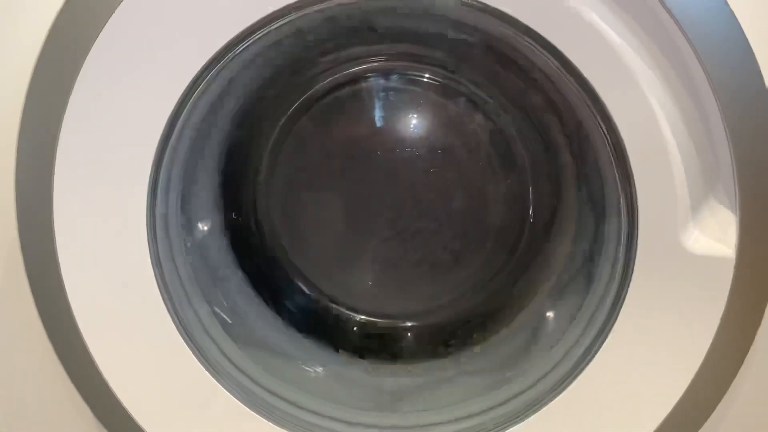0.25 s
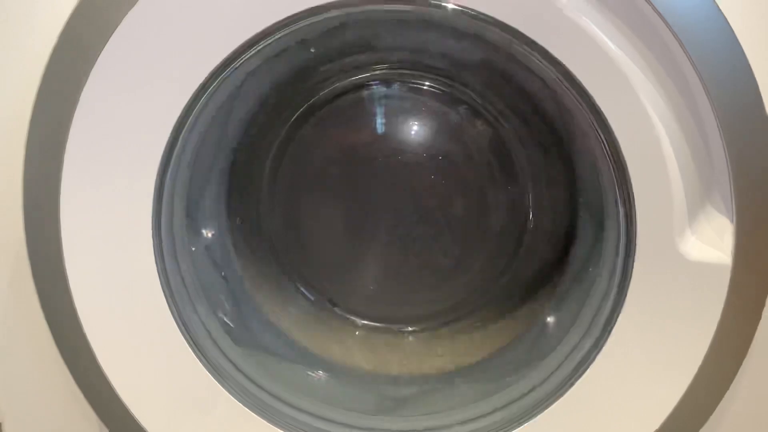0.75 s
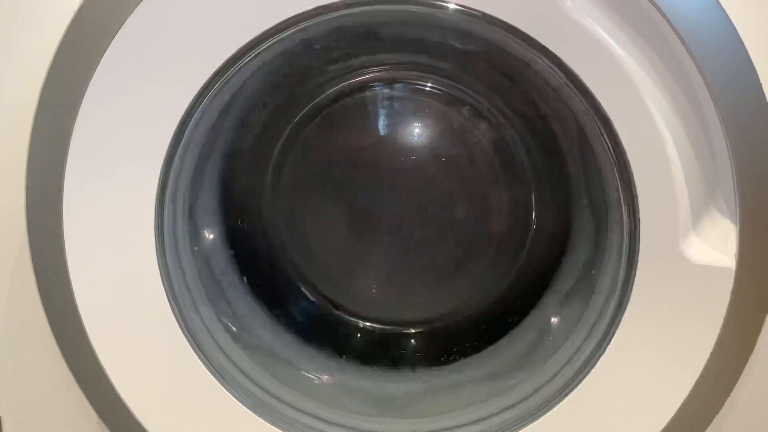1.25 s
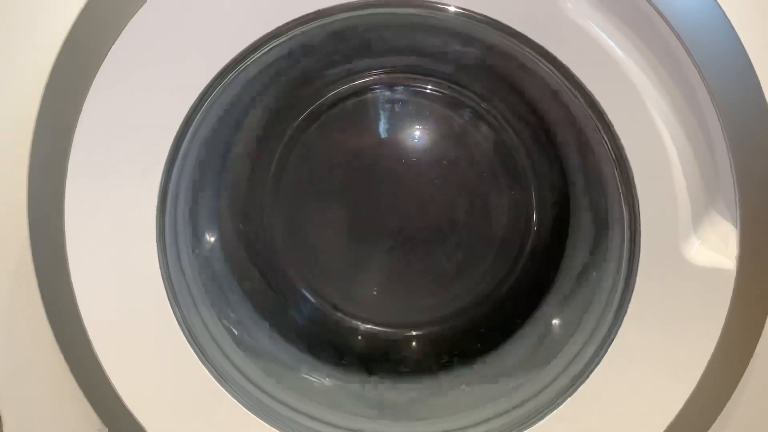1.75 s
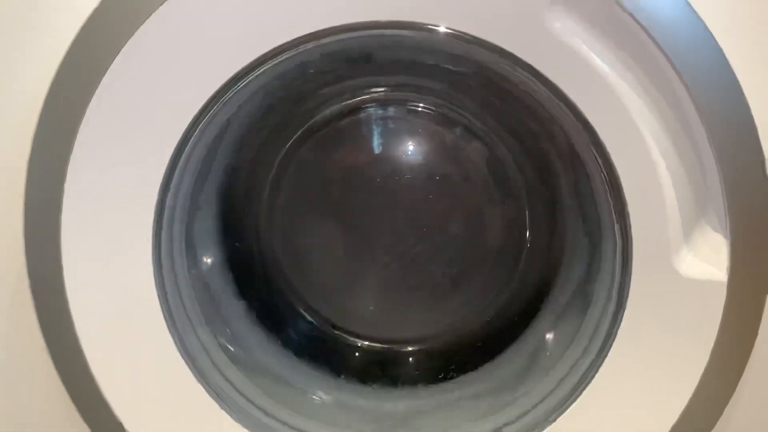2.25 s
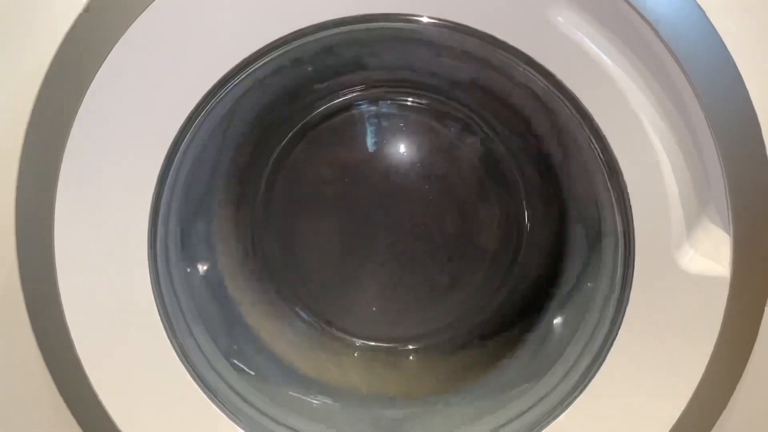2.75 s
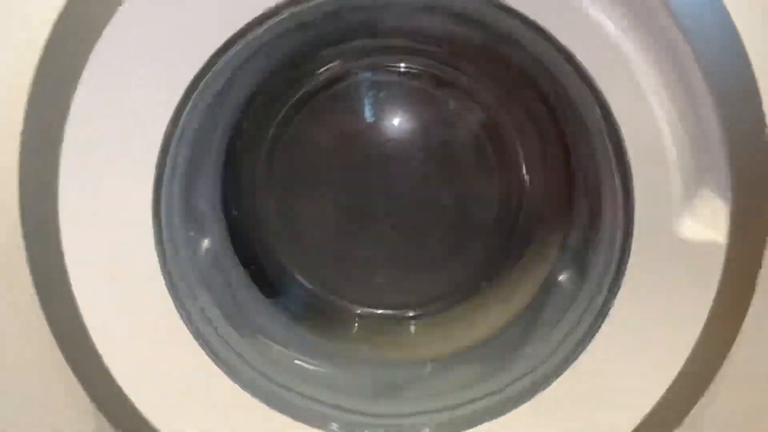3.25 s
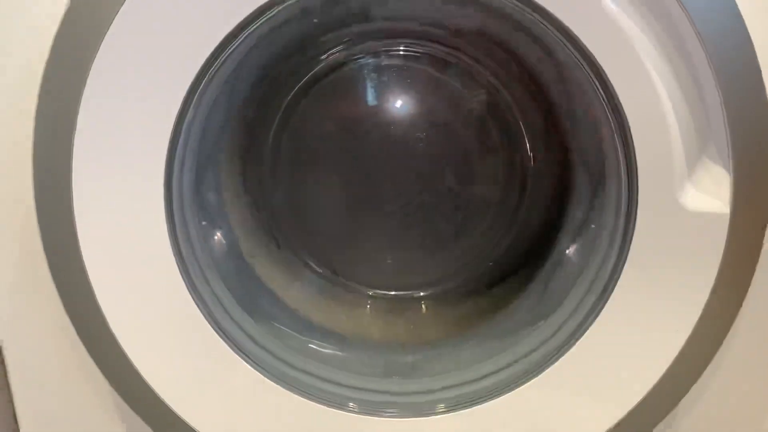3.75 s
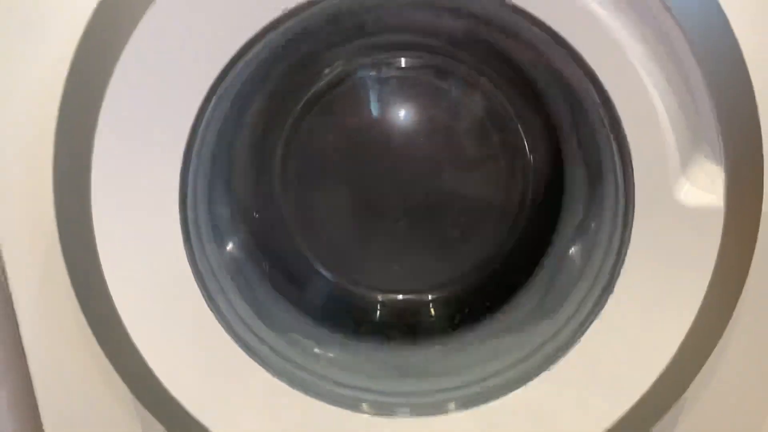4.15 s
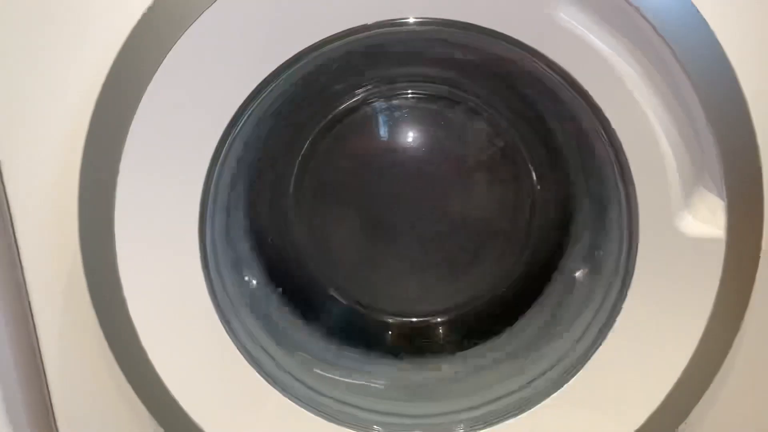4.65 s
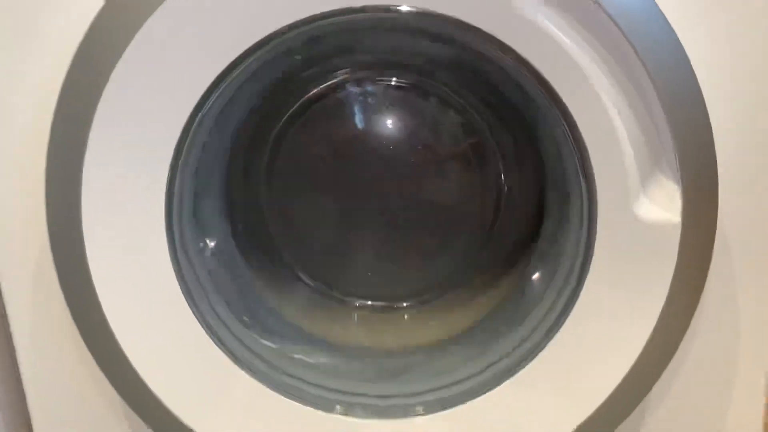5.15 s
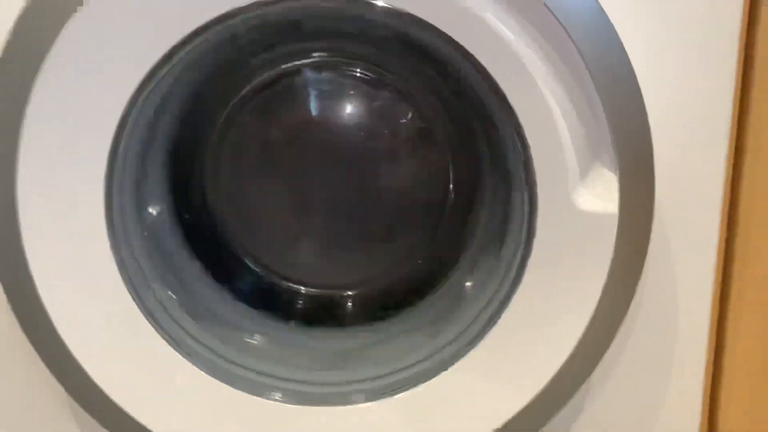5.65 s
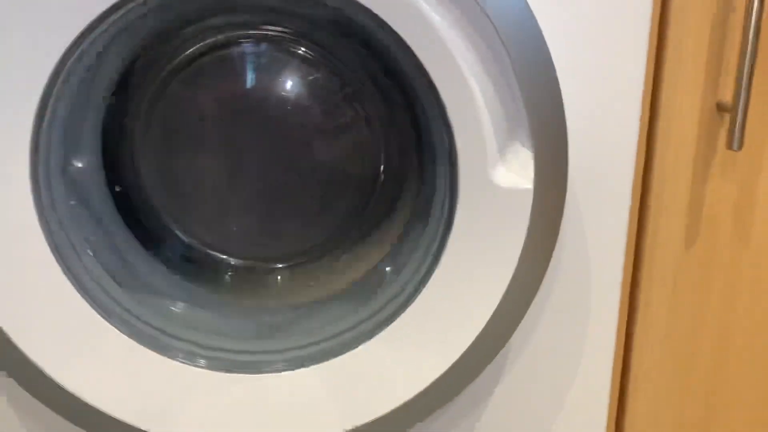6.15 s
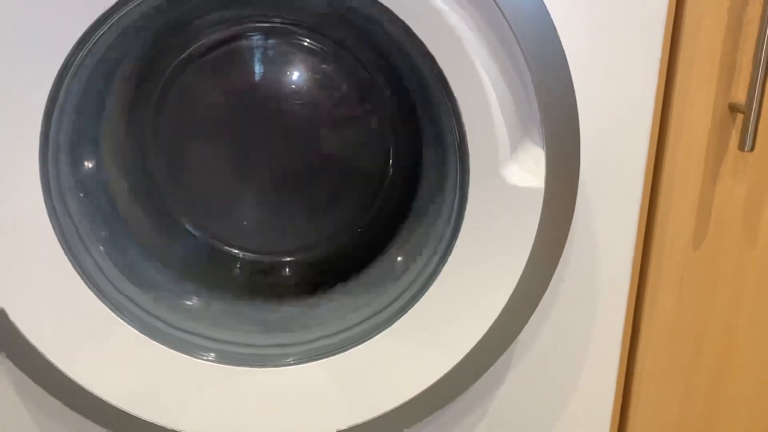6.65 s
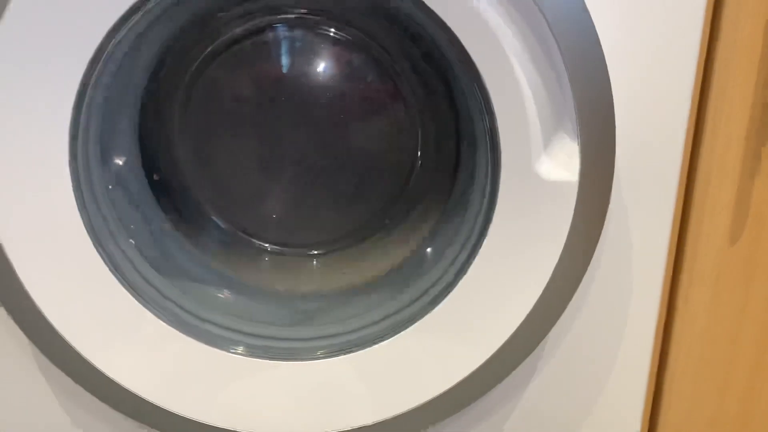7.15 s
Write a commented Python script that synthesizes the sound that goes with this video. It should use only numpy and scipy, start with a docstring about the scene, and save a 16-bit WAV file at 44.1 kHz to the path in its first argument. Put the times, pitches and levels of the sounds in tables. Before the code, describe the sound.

A front-loading washing machine in fast spin, heard close to its door on a hand-held phone in a domestic room. A deep, rapid drum thrum and throbbing mid hum sit under a broad airy roar and fine hiss. Speed rises barely perceptibly. Around three seconds the tone colour shifts as the phone turns and a thin whine emerges. Past five seconds something flicks the drum with a short, scratchy metallic twang; the spin continues.

```python
"""A thumping drum, once a turn, heard from a hand-held phone before the door of a front-loading washing
machine that slowly gains speed. Overtones locked to the turn make the thump and a slower belt throb.
Air and cabinet roar and hiss as shaped noise, over speed-locked and steady tones; the colour shifts as
the phone tilts after a few seconds. Once, something flicks the drum: damped modes ring a short twang."""
import sys
import numpy as np
from scipy import signal
from scipy.fft import rfft, irfft
from scipy.io import wavfile
from scipy.ndimage import uniform_filter1d, minimum_filter1d, map_coordinates

SR = 44100
rng = np.random.default_rng(int(sys.argv[2]) if len(sys.argv) > 2 else 0)


def unload_audio(sound):
    """Save the sound as a 16-bit wav file, at the path given as the first command line argument."""
    columns = np.transpose(np.atleast_2d(sound))
    # keep every value between -1 and 1, then stretch to whole-number steps
    steps = np.round(np.clip(columns, -1, 1) * 32767)
    wavfile.write(sys.argv[1], SR, steps.astype(np.int16))


N = 326340
T = np.arange(N) / SR  # time [s]
HZ = np.arange(1025)[:, None] * SR / 2048  # frequency of each noise bin
FRAMES = np.arange(N // 512 + 5) * 512 / SR  # time of each noise frame [s]

# cabinet resonances that the drum's knock rings: (centre [Hz], width [Hz], level [dB], left minus right [dB])
PANEL_MODES = [(47.3, 11.6, -37.9, 0.2), (69.1, 10.3, -32.1, 1.3), (90.5, 13.2, -28.9, 0.5),
               (107.3, 9.8, -21.9, 0.3), (134.4, 5.0, -37.3, 2.4), (154.9, 33.4, -43.8, 1.4),
               (187.9, 22.2, -39.0, 2.6), (224.7, 9.5, -37.4, 3.0), (247.2, 11.2, -37.7, 1.1),
               (266.0, 45.5, -43.6, 0.2), (304.0, 5.7, -45.0, 1.4), (326.2, 11.5, -47.0, 2.4),
               (379.2, 14.1, -48.9, 4.8), (411.1, 14.0, -49.7, -3.9), (438.5, 8.6, -46.5, 1.2),
               (455.5, 17.8, -53.4, -1.7)]
DRUM_ORDERS = np.arange(2, 32)  # audible overtones of one drum turn
THUMP_DRIFT_DB_S = -0.04  # slow change of level
SMEAR_RAD, SMEAR_FROM, SMEAR_UNTIL = .76, 8, 23.2  # lag per overtone squared; first and last overtone
DETOUR_RAD, DETOUR_FROM = 2.3, 15  # further lag per overtone, counted from this one
LOW_LAG_RAD, LOW_LAG_UNDER = .4, 6  # lag per overtone, counted down from this one
DRUM_OPPOSED = 20  # from this overtone up the ringing parts swing against the knock


def drum_thump(drum):
    """Forced vibration: the unbalanced drum drives the panels once a turn, with dispersed overtones."""
    # above the main cabinet boom the overtones lag progressively, smearing the thump round the turn
    smear = SMEAR_RAD * np.maximum(DRUM_ORDERS - SMEAR_FROM, 0) ** 2
    # the squared lag stops gaining curvature at the highest overtones
    smear = smear - SMEAR_RAD * np.maximum(DRUM_ORDERS - SMEAR_UNTIL, 0) ** 2
    # the panels fall behind by one more cycle
    smear = smear + np.clip(DETOUR_RAD * (DRUM_ORDERS - DETOUR_FROM), 0, 2 * np.pi)
    smear = smear + LOW_LAG_RAD * np.maximum(LOW_LAG_UNDER - DRUM_ORDERS, 0)  # the deepest trail too
    smear = smear + np.pi * (DRUM_ORDERS >= DRUM_OPPOSED)
    thump = knock_overtones(DRUM_ORDERS, drum, PANEL_MODES, smear, .3, .04)
    return thump * undb(THUMP_DRIFT_DB_S * (T - T.mean()))


def knock_overtones(orders, turns, modes, smear, waver_db, waver_rad):
    """Fourier synthesis: one knock a turn, its overtones swelling as speed moves them past resonances."""
    out = 0
    coarse = T[::512]
    rate = np.gradient(turns)[::512] * SR  # turns a second
    mean_db, _ = response(orders * rate.mean(), modes)
    lags = knock_lags(orders, mean_db) - smear
    for k, lag in zip(orders, lags):
        db, pan = (np.interp(T, coarse, v) for v in response(k * rate, modes))
        out = out + tone(k * turns + lag / (2 * np.pi), db, pan, waver_db, waver_rad)
    return out


BETWEEN_DB = -62  # level floor between resonances


def response(hz, modes):
    """Modal superposition: the resonances' powers add to give level and left-right balance [dB] at hz."""
    power = [undb(2 * db) / (1 + (2 * (hz - f) / width) ** 2) ** 2 for f, width, db, _ in modes]
    pan = sum(p * row[3] for p, row in zip(power, modes)) / sum(power)
    return 10 * np.log10(sum(power) + undb(2 * BETWEEN_DB)), pan


def knock_lags(k, db):
    """Minimum phase: a causal knock and ring has phases fixed by the levels of its overtones."""
    n = np.arange(129)
    # levels fall away below the first overtone and above the last
    db = np.interp(n, k, db) - 10 * np.maximum(k[0] - n, 0) - .5 * np.maximum(n - k[-1], 0)
    cepstrum = irfft(np.maximum(db, -100) * np.log(10) / 20)
    # folding the cepstrum to positive time makes the response causal
    cepstrum[1:128] *= 2
    cepstrum[129:] = 0
    return rfft(cepstrum).imag[k]


def tone(cycles, db, pan, waver_db, waver_rad):
    """Phase locking: a sine follows a turning part, with small random wander in level and phase."""
    level = np.sqrt(2) * undb(db + waver_db * walk(3))
    wave = level * np.cos(2 * np.pi * cycles + waver_rad * walk(2))
    return sides(wave, pan)


def walk(rate):
    """Band-limited randomness: random knots, rate a second, joined by a smooth curve, spread near 1."""
    knots = rng.standard_normal(int(N / SR * rate) + 3)
    coarse = T[::256]
    return np.interp(T, coarse, map_coordinates(knots, [coarse * rate], order=2))


def sides(x, pan_db):
    """Level-difference stereo: pan_db is left minus right."""
    return x * undb(np.array([pan_db, -pan_db]).reshape(2, -1) / 2)


def undb(db):
    """Logarithmic level: decibels to amplitude."""
    return 10 ** (np.asarray(db) / 20)


def curve(table, at=T):
    """Linear interpolation: the value of a (time [s], value) table at each moment."""
    return np.interp(at, *np.transpose(table))


# resonances that the belt's knock rings: (centre [Hz], width [Hz], level [dB], left minus right [dB])
PULLEY_MODES = [(667, 7.3, -46, -2), (686.5, 22, -52, 2), (713.3, 40.5, -48.5, 3.5), (752, 14, -53, 5)]
# level of the belt's throb: (time [s], level [dB])
THROB_LEVEL = [(0, 1.5), (2.6, 0.5), (3.5, 0.5), (4.2, -4), (6.1, -5.5), (6.6, 0.5), (7.4, -0.5)]
# how far the phone has turned, for the throb and the roar: (time [s], turn [0-1])
PHONE_TILT = [(0, 0), (2.4, 0.2), (3.05, 0.9), (5, 1), (7.4, 0.86)]
BELT_ORDERS = np.arange(59, 71)  # audible overtones of one belt loop
BELT_OPPOSED = 69  # from this overtone up the ringing parts swing against the knock


def belt_throb(drum, belt):
    """Periodic excitation and modulation: the belt knocks once a loop; the drum sways its tension."""
    opposed = np.pi * (BELT_ORDERS >= BELT_OPPOSED)
    blur = .12 + .5 * curve(PHONE_TILT)  # phase wander [rad]: less crisp once the phone has turned
    throb = knock_overtones(BELT_ORDERS, belt, PULLEY_MODES, opposed, .9, blur) * undb(curve(THROB_LEVEL))
    # the wobbling drum tightens and slackens the belt once a turn
    return throb * (1 + 0.13 * np.cos(2 * np.pi * drum + 1.6))


# broadband roar of drum and air, before resonances and swells: (frequency [Hz], density [dB per Hz])
ROAR_SPECTRUM = [(25, -87), (45, -78), (70, -62), (90, -59), (112, -62), (130, -68), (200, -68), (290, -69),
                 (420, -66), (600, -64.5), (740, -67), (950, -69), (1500, -74), (2000, -76), (3000, -80.5),
                 (4200, -84), (5500, -87.5), (8000, -143), (16000, -105)]
# cabinet resonances over the roar: (centre [Hz], width [Hz], left before the phone turns [dB],
# right before [dB], left after [dB], right after [dB])
CABINET_MODES = [(692, 49, 5, 3.5, 7, 2), (1182, 344, 3.5, 3.5, 9.5, 3.5), (1429, 94, 3.5, 5, 7, 4),
                 (1653, 135, -5.5, -8, 7.5, 8.5), (1707, 135, 10, 13, -2, -8), (2230, 29, 11, 11.5, 10, 5),
                 (2580, 550, 2.5, 2, -0.5, 0), (3330, 120, 5, -1, 2, 2.5), (4640, 450, 0, 2, 5.5, 4.5),
                 (468, 30.5, -5, -21, -7, -28), (616, 35, -32, 0, -2, -18)]
# left-right correlation of the roar without its whine: (frequency [Hz], correlation [0-1])
CORRELATION = [(60, 0.8), (150, .4), (290, 0.55), (640, 0.4), (1400, 0.24), (2500, .2), (3500, .06),
               (16000, 0.03)]
# narrow whine: (time [s], level over the roar [dB], centre [Hz])
WHINE_TRACK = [(0, 1, 3920), (2.4, 2, 3920), (3.1, 7.5, 3925), (4.0, 4, 3890), (5.2, 5.5, 3870),
               (5.8, 7.5, 3870), (6.4, 7, 3885), (6.9, 12, 3905), (7.4, 10.5, 3920)]
# slow changes of the roar as the phone moves: ((centre [Hz], width [Hz]), [(time [s], level [dB])])
ROAR_SWELLS = [((2600, 1900), [(0, -0.5), (2.5, 0), (3.5, 0.5), (4.2, -.5), (7.4, -1)]), ((510, 150),
               [(0, 4), (2.6, 2), (3.5, 5.5), (4.2, 1), (7.4, 2.5)])]
WHINE_WIDTH_HZ = 140
ROCK_HZ, ROCK_DEPTH, ROCK_RAD = [750, 2300], .22, 2.1  # band that flutters each drum turn, depth, phase
LEFT_LATE_S, LATE_FROM_HZ = .00102, [700, 1300]  # left port's delay; sets in across this band


def roar(drum, belt):
    """Spectral shaping: the cabinet colours turbulent noise; turning the phone shifts it, rotation rocks it."""
    tilt = curve(PHONE_TILT, FRAMES)
    s, whine_db, whine_hz = np.transpose(WHINE_TRACK)
    whine_bump = bump(np.interp(FRAMES, s, whine_hz), WHINE_WIDTH_HZ)
    whine = np.interp(FRAMES, s, whine_db) * whine_bump
    like = np.clip(on_log(HZ, CORRELATION) + 0.085 * whine, 0, 1)  # the whine comes from one spot
    # sound from the drum rounds the phone to the left port
    delay = LEFT_LATE_S * np.interp(HZ, LATE_FROM_HZ, [0, 1])
    late = np.exp(-2j * np.pi * HZ * delay)
    base = on_log(HZ, ROAR_SPECTRUM) + flicker(1.43) + whine
    base = base + sum(curve(rows, FRAMES) * bump(*band) for band, rows in ROAR_SWELLS)
    shared, out = grains(base), []
    for side in range(2):
        db = base
        for row in CABINET_MODES:
            mode_db = row[2 + side] * (1 - tilt) + row[4 + side] * tilt
            db = db + mode_db * bump(*row[:2])
        common = np.sqrt(like) * shared * late ** (1 - side)
        own = np.sqrt(1 - like) * grains(db)
        out.append(paint(common + own, db))
    rocked = signal.sosfilt(signal.butter(2, ROCK_HZ, "band", fs=SR, output="sos"), out)
    out = out + ROCK_DEPTH * np.cos(2 * np.pi * drum + ROCK_RAD) * rocked
    return out * (1 + 0.026 * np.cos(2 * np.pi * belt - .6))


def bump(hz, width):
    """Resonance weighting: a bell curve over frequency, 1 at its centre."""
    return np.exp(-2 * ((HZ - hz) / width) ** 2)


def on_log(hz, table):
    """Logarithmic frequency scale: a table read with straight lines between log frequencies."""
    f, v = np.transpose(table)
    return np.interp(np.log(np.maximum(hz, 1)), np.log(f), v)


def flicker(depth_db, count=40):
    """Independent band fluctuation: each band of the noise wavers a little by itself."""
    cells = rng.standard_normal((count, len(FRAMES)))
    cells = uniform_filter1d(cells, size=3, axis=1) * np.sqrt(3)  # smoothed, spread restored
    rows = np.log(np.maximum(HZ[:, 0], 20) / 20) / np.log(1200) * (count - 1)
    return depth_db * cells[rows.astype(int)]


def grains(db):
    """Gaussian noise: a random complex value for each bin and frame."""
    return rng.standard_normal(db.shape + (2,)) @ [1, 1j]


def paint(bins, db):
    """Short-time Fourier synthesis: noise bins weighted to a density in dB per Hz (bins x frames)."""
    return signal.istft(bins * undb(db), nperseg=2048, noverlap=1536, scaling="psd", fs=SR)[1][:N]


# fine hiss: (frequency [Hz], density [dB per Hz])
HISS_SPECTRUM = [(4000, -104), (6000, -88.5), (7500, -88), (9000, -84.5), (10500, -84), (13000, -86.5),
                 (14000, -90), (16000, -91)]
HISS_DIRECT = .93  # share of power from one direction
HISS_LAG_S, HISS_TURN_RAD = .000213, -2.1  # right port's delay and phase turn


def hiss(belt):
    """Interaural delay: directional noise reaches the right port later; the scattered rest is unrelated."""
    db = on_log(HZ, HISS_SPECTRUM) + flicker(1.4)
    direct, left, right = (paint(grains(db), db) for _ in range(3))
    hz = np.arange(N // 2 + 1) * SR / N
    late = irfft(rfft(direct) * np.exp(-1j * (2 * np.pi * hz * HISS_LAG_S + HISS_TURN_RAD)), N)
    both = np.sqrt(HISS_DIRECT) * np.array([direct, late])
    both = both + np.sqrt(1 - HISS_DIRECT) * np.array([left, right])
    return both * (1 + 0.072 * np.cos(2 * np.pi * belt - .6))


# blows on the drum: (time [s], relative level [dB], centre of colour [Hz], spread [octaves],
# left minus right [dB], scratchy share [0-1])
DRUM_BLOWS = [(5.3594, -30, 2680, .035, -5, .4), (5.365, -28, 2760, 0.046, -2, 0.4),
              (5.382, -25.5, 2770, 0.034, 1, 0.6), (5.383, -24, 1220, 0.044, -1, 0.6),
              (5.403, -15, 3370, 0.45, -0.5, 0.43), (5.411, -17, 444, 0.13, -2.5, 0.14),
              (5.4058, -14.5, 1370, 0.54, 8.5, 0.35), (5.414, -24.5, 3000, 0.13, -2, .8),
              (5.417, -16, 1320, 0.21, -16, 0.4), (5.43, -19.5, 1340, 0.16, 13, 0.7),
              (5.429, -25, 4700, .1, 9, .5), (5.440, -24, 1500, 0.48, -4, 0.7),
              (5.461, -24, 1300, 0.43, 8, 0.8), (5.482, -31, 1270, 0.094, 4, .5)]
# drum shell modes: (frequency [Hz], relative level [dB], 60 dB decay time [s])
SHELL_MODES = [(431, -2, .08), (800, -8, .025), (1080, -3, .04), (1230, -2, .05), (1400, -3, .035),
               (1620, 0, .03), (2290, -3, .02), (2730, -3, .03), (2940, 0, .025), (3200, -2, .015),
               (3800, -5, .015), (4400, -2, .015), (4770, -2, .035), (5300, -3, .012), (6500, -5, .008)]
TAP_S, CONTACT_S = 0.00091, 0.0043  # rise of a clean tap; decay of a scratchy contact
SCRATCH_DB = -2  # the contact itself, heard beside the ring


def drum_blows():
    """Modal impact: taps and scratchy contacts ring the damped modes of the drum shell."""
    t = T[:SR // 2]
    out = np.zeros((2, N))
    for s, db, centre_hz, octaves, pan, scratchy in DRUM_BLOWS:
        # each port hears its own patch of shell
        push = rng.standard_normal((2, len(t))) * np.exp(-t / CONTACT_S) * (1 - np.exp(-t / 0.00069))
        push = push / np.sqrt(np.sum(push ** 2, axis=1, keepdims=True))
        ring = 0
        for hz, mode_db, t60 in SHELL_MODES:
            colour = np.exp(-.5 * (np.log2(hz / centre_hz) / octaves) ** 2)
            decay = np.exp(-np.log(1000) * t / t60)
            ring = ring + undb(mode_db) * colour * np.sin(2 * np.pi * hz * t) * decay
        ring = ring / np.sqrt(np.sum(ring ** 2))
        edges = centre_hz * 2 ** (np.array([-1, 1]) * octaves)
        band = signal.butter(2, edges, "band", fs=SR, output="sos")
        gain = np.sqrt(SR / 2 / centre_hz / octaves)  # offsets the energy lost in a narrow band
        contact = undb(SCRATCH_DB) * gain * signal.sosfilt(band, push)
        scratch = signal.fftconvolve(push, ring[None])[:, :len(t)] + contact
        tap = ring * (1 - np.exp(-t / TAP_S))
        sound = np.sqrt(1 - scratchy) * tap + np.sqrt(scratchy) * scratch
        sound = undb(db) * np.sqrt(SR * CONTACT_S / 2) * sound
        i = int(s * SR)
        out[:, i:i + len(t)] += sides(sound, pan)
    return out


# bright cracks of the main blow: (time [s], level before the band filter [dB])
BLOW_CRACKS = [(5.405, -12), (5.4038, -19.5)]
CRACK_HZ, CRACK_WIDTH_HZ, CRACK_S = 10900, 1700, .0013  # centre, width; rise and decay time


def cracks():
    """Impulsive noise: short band-passed bursts reach the right port late and turned in phase."""
    t = T[:SR // 2]
    out = np.zeros((2, N))
    edges = [CRACK_HZ - CRACK_WIDTH_HZ / 2, CRACK_HZ + CRACK_WIDTH_HZ / 2]
    band = signal.butter(1, edges, "band", fs=SR, output="sos")
    for s, db in BLOW_CRACKS:
        swell = t / CRACK_S * np.exp(1 - t / CRACK_S)
        crack = signal.sosfilt(band, undb(db) * rng.standard_normal(len(t)) * swell)
        turned = np.real(signal.hilbert(crack) * np.exp(-1j * HISS_TURN_RAD))
        i = int(s * SR)
        out[:, i:i + len(t)] += np.array([crack, np.roll(turned, round(HISS_LAG_S * SR))])
    return out


ROOM_T60_S, ROOM_DB = 0.5, -4


def twang():
    """Reverberation: the room spreads the blows and cracks into a short, decaying wash."""
    t = T[:SR // 2]
    out = drum_blows() + cracks()
    decay = np.exp(-np.log(1000) * t / ROOM_T60_S) * (1 - np.exp(-t / 0.0068))
    tail = rng.standard_normal((2, len(t))) * decay
    tail = signal.lfilter([1], [1, -0.15], tail)  # walls keep the treble less
    tail = tail / np.sqrt(np.sum(tail ** 2, axis=1, keepdims=True))
    return out + undb(ROOM_DB) * signal.fftconvolve(out, tail, axes=1)[:, :N]


# lone tones that follow the speed: (cycles per drum turn, level at the start [dB], level at the end [dB],
# left minus right [dB])
DRIVE_TONES = [(10.6635, -60, -57, 1), (14.5744, -62, -52, 4), (15.3031, -52, -56, 1),
               (21.327, -52, -56, 2)]


def drive_tones(turns):
    """Order tracking: each tone keeps a fixed number of cycles per drum turn."""
    out = 0
    for k, first_db, last_db, pan in DRIVE_TONES:
        db = first_db + (last_db - first_db) * T / T[-1]
        out = out + tone(k * turns + rng.uniform(), db, pan, 5.0, 0.088)
    return out


# steady tones: (frequency [Hz], level [dB])
HUM_TONES = [(58.1, -55), (100.15, -46), (200.4, -60), (300.4, -61), (400.8, -57), (500.9, -63)]


def hum():
    """Additive synthesis: steady sines, independent of the drum's speed."""
    return sum(np.sqrt(2) * undb(db) * np.sin(2 * np.pi * hz * T) for hz, db in HUM_TONES)


# drum speed: (time [s], rate [turns per second])
DRUM_SPEED = [(0, 14.862), (3.7, 15.042), (7.4, 15.231)]
BELT_RATIO = .72872  # belt loops for each drum turn
DRUM_START, BELT_START = .364, .666  # turns since the last knock at time zero


def scene():
    """Superposition: one integrated rotation drives the turning parts, and all the sources add."""
    turns = np.cumsum(curve(DRUM_SPEED)) / SR
    drum = turns + DRUM_START
    belt = BELT_RATIO * turns + BELT_START
    machine = drum_thump(drum) + belt_throb(drum, belt) + roar(drum, belt) + hiss(belt)
    return machine + twang() + drive_tones(turns) + hum()


LIMIT_DB, LIMIT_HOLD_S = -7, 0.045  # peak level where gain starts to fall; how long a peak counts
TOP_HZ = 15750


def record(dry):
    """Dynamic compression: the phone's gain control backs off briefly after loud peaks; a low-pass follows."""
    hold = int(LIMIT_HOLD_S * SR)
    # loudest sample of the recent past
    peak = -minimum_filter1d(-abs(dry).max(0), hold, origin=(hold - 1) // 2)
    gain = np.minimum(undb(LIMIT_DB) / peak, 1) ** 0.3
    gain = uniform_filter1d(gain, size=200)
    return signal.sosfilt(signal.ellip(12, .2, 80, TOP_HZ, fs=SR, output="sos"), dry * gain)


dry = scene()
out = record(dry)
unload_audio(out)
```